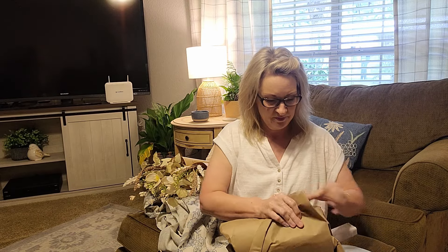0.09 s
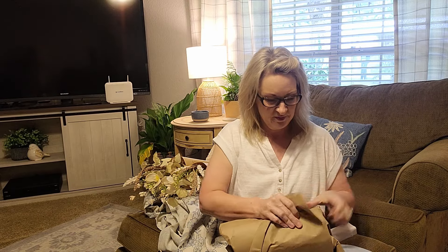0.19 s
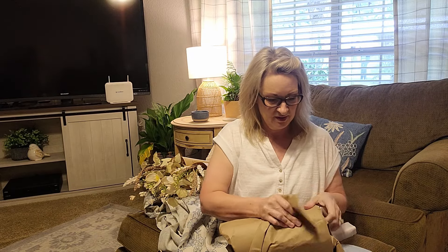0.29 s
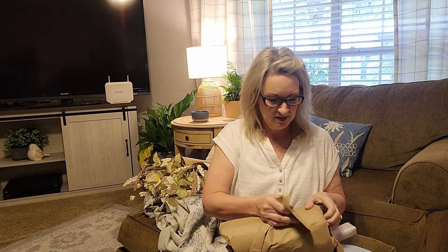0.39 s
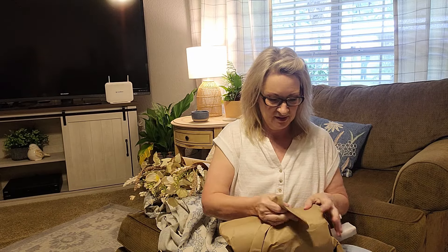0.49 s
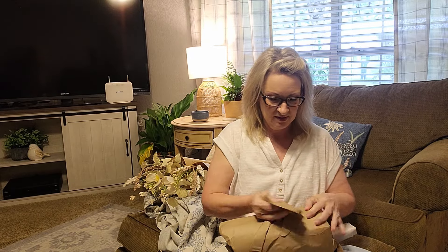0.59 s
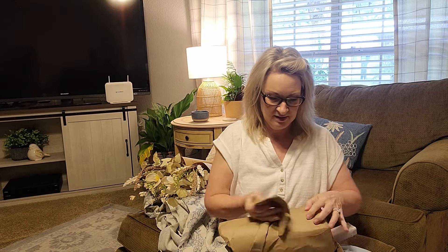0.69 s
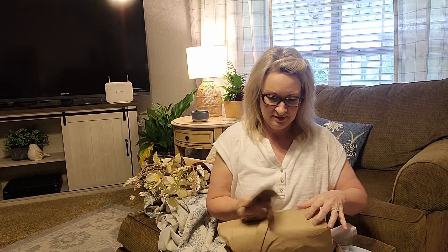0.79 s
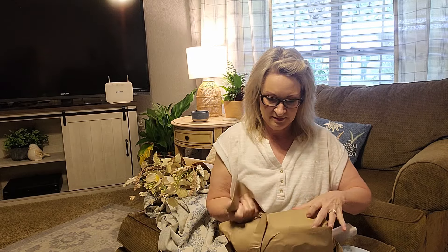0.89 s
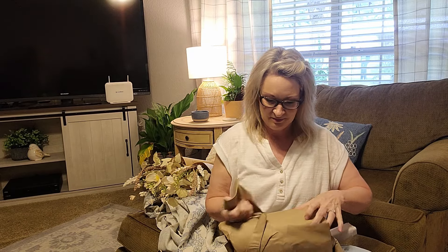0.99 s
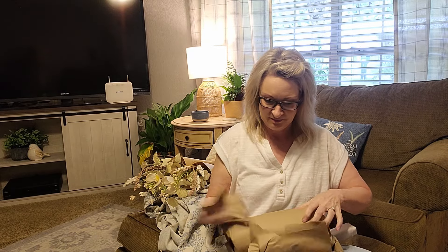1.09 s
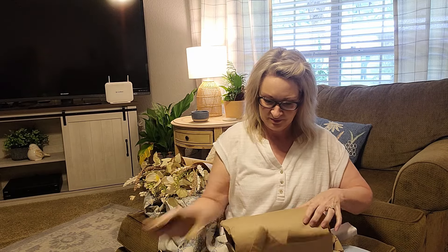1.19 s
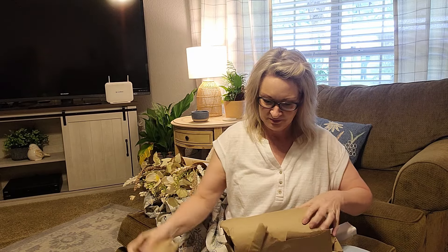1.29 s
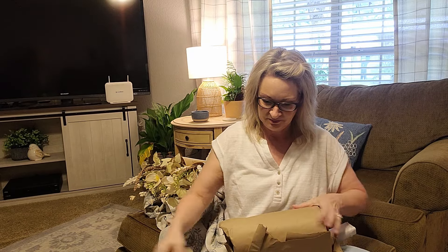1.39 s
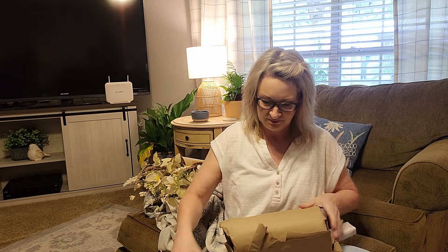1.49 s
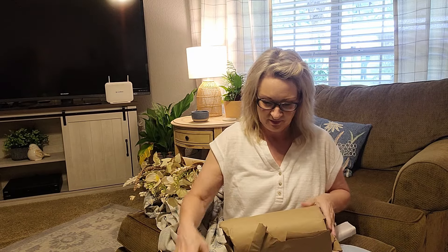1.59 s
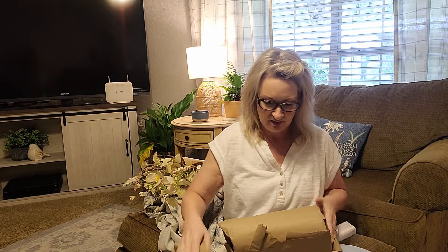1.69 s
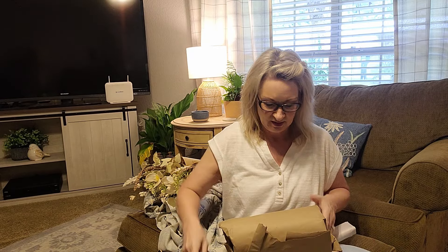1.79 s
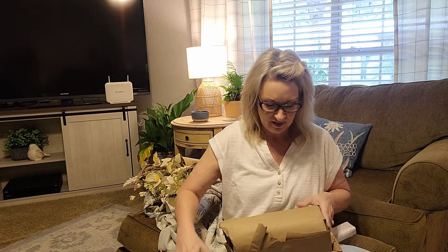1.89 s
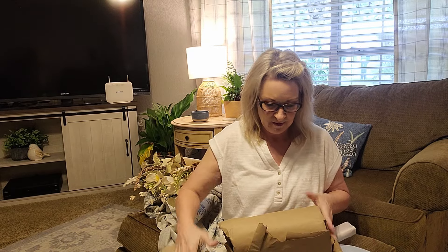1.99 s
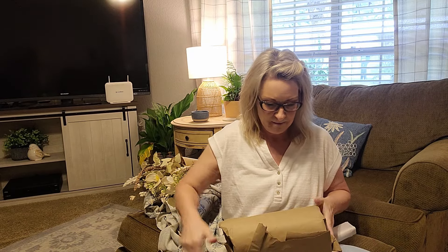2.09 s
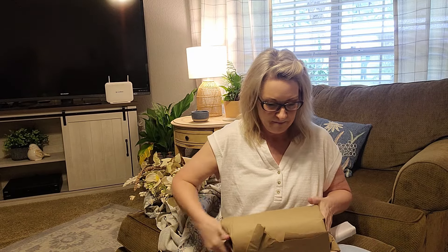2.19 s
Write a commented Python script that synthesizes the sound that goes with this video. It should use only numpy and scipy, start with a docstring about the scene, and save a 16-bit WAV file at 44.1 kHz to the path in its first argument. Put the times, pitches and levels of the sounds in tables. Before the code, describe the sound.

Stiff wrapping paper crackles and pops as it is pulled open in three sweeps, with soft hand bumps on the parcel. It settles into light rustling, picked up by a nearby microphone in a quiet furnished room.

```python
"""Brown wrapping paper is picked at, pulled open in three sweeps and laid aside.
Its creases buckle in a dense crackle, with single snaps and hollow pops on top.
Underneath, the sheet flaps and the hands bump the parcel. A small stereo microphone a few steps
away hears the paper, the short answer of a furnished living room and a faint rumble."""
import sys
import numpy as np
from scipy import signal
from scipy.fft import rfft, irfft, next_fast_len
from scipy.io import wavfile
from scipy.ndimage import map_coordinates

SR = 44100
rng = np.random.default_rng(int(sys.argv[2]) if len(sys.argv) > 2 else 0)


def generate_wav(signal):
    """Clip the signal to [-1, 1] and save it as 16-bit WAV at the path in sys.argv[1]."""
    frames = np.transpose(np.atleast_2d(signal))
    scaled = np.clip(frames, -1, 1) * 32767
    pcm = np.round(scaled).astype(np.int16)
    wavfile.write(sys.argv[1], SR, pcm)


N = 97020

# tone of the room's rumble (frequency [Hz], gain [dB])
RUMBLE_EQ = [(20, -18), (60, 2), (220, -9.5), (310, -0.5), (500, -29.5), (1000, -27)]
# length of the reverb tail (frequency [Hz], t60 [s])
TAIL_T60 = [(100, 0.24), (1500, 0.18), (5000, 0.22), (15000, 0.17)]
# tone of the reverb (frequency [Hz], gain [dB])
REVERB_EQ = [(100, -9.5), (2500, -3.5), (7000, -5.5), (15000, 0)]
# how alike the room sounds left and right (frequency [Hz], correlation [0..1])
ROOM_CORRELATION = [(400, 0.81), (1300, 0.26), (2600, 0.24), (5000, 0.012)]
# colour of the microphone (frequency [Hz], gain [dB])
MIC_EQ = [(450, 2), (620, -4.5), (790, 4), (5300, 0.5), (6100, -3.5), (7300, 0), (8400, -12.5),
          (10000, -12.5), (11800, -2.5), (15500, -8)]
# mismatch of its two channels (frequency [Hz], left minus right [dB])
MIC_BALANCE = [(100, -0.4), (700, 0.8), (2400, 1.1), (5000, 0.5), (8000, 7.5), (12000, -2)]
# the paper's drift in the stereo image (time [s], lead of the left channel [ms])
LEFT_LEAD = [(.6, 0.11), (.85, 0.062), (1.15, 0.046), (1.4, 0.15)]
# modes of the hollow parcel (pitch ratio [1], level [dB], t60 of a 300 Hz bump [s])
PARCEL_MODES = [(0.998, -2, 0.076), (1.88, -8, 0.04)]
# fingers bumping the parcel and the slack sheet (time [s], relative level [dB], pitch [Hz])
HAND_BUMPS = [(0.223, -29, 346), (0.274, -27, 293), (.3, -25.5, 300), (.29, -30.5, 163), (0.348, -28, 299),
              (0.444, -28, 282), (0.447, -36, 170.5), (0.593, -23.5, 285), (.83, -24.5, 336),
              (1.186, -32.5, 80), (1.353, -40.5, 376), (1.773, -39, 300), (1.911, -38, 322),
              (2.068, -31.5, 173), (2.083, -35, 148)]
# stiff panels popping through (time [s], level [dB], pitch [Hz])
PANEL_POPS = [(.106, -30, 520), (.267, -24.5, 1340), (.274, -22.5, 1540), (0.276, -27.5, 870),
              (.304, -28.5, 854), (.5925, -21.5, 1354), (.597, -5.5, 2360), (0.828, -21, 2350),
              (.878, -24, 1030), (1.1799, -10.5, 2850), (1.523, -43, 1035), (2.185, -28.5, 440),
              (2.1849, -29.5, 850)]
# single creases snapping (time [s], relative level [dB], treble lift and bass cut [dB])
CREASE_SNAPS = [(.1056, -19.5, -2), (.1502, -29, -6.5), (.1845, -16.5, 6.5), (.2027, -25, 2),
                (.2335, -10.5, 5), (.309, -17, 2.5), (.3415, -18, 9.5), (.376, -15.5, 2.5),
                (.47, -15, 11.5), (.531, -13.5, 3.5), (.5658, -18, 11.5), (.5795, -9.5, 5.5),
                (.5912, -8.5, -1), (.6076, -11, 13), (.726, -17.5, 7), (.795, -19.5, -6),
                (.8668, -9.5, 8.5), (.89, -10.5, 4), (1.1001, -15, 18.5), (1.1227, -21, -7.5),
                (1.1862, -14, -7.5), (1.2933, -22.5, 2.5), (1.3915, -25.5, -0.5), (1.789, -39, -10),
                (1.837, -38, -8.5), (2.0239, -29, -6), (2.0674, -33, -7.5)]
# tone of a snap before its tilt (frequency [Hz], gain [dB])
SNAP_EQ = [(80, -48), (300, -22.5), (1100, -0.5), (2400, 0), (5000, 1), (16000, -14)]
# low body of the flapping panels (frequency [Hz], gain [dB])
FLAP_EQ = [(30, -16), (75, -16), (160, -9), (215, -13), (305, -4), (420, -3.5), (820, -8), (1250, -15),
           (2500, -42)]
# bite of the crackling creases (frequency [Hz], gain [dB])
CRACKLE_EQ = [(200, -20.5), (700, -12.5), (1200, 0.5), (2400, -1.5), (3500, 3.5), (5200, 1), (7000, -2.5),
              (10000, -26)]
# airy top of the finest wrinkles (frequency [Hz], gain [dB])
FIZZ_EQ = [(2500, -49), (5000, -26), (7000, -0.5), (9000, 2), (12000, -5), (16000, -5)]
# fader rides of the moving sheet, before trims (time [s], flap [dB], crackle [dB], fizz [dB])
SHEET_FADERS = [(0, -54.5, -45, -55), (.125, -51.5, -51, -53.5), (.175, -58.5, -59, -57),
                (.22, -49.5, -39.5, -42), (.28, -42.5, -37, -38.5), (.35, -43.5, -36, -38),
                (.41, -53, -42.5, -42.5), (.475, -43.5, -33.5, -37.5), (.51, -54, -45, -45),
                (.555, -44.5, -37, -33.5), (.591, -39.5, -22.5, -24.5), (.625, -49.5, -34, -46),
                (.675, -54.5, -48, -51), (.77, -49, -38, -39.5), (.81, -41, -32, -31),
                (.89, -39.5, -26.5, -29), (.92, -49.5, -40.5, -50), (.96, -54, -45.5, -51.5),
                (1.04, -52.5, -41.5, -37), (1.12, -40.5, -27, -30), (1.19, -39, -25.5, -33),
                (1.215, -50, -50, -81), (1.26, -56, -58.5, -66), (1.34, -60.5, -58.5, -58),
                (1.39, -49, -50, -49.5), (1.43, -67.5, -64, -74), (1.5, -68, -62, -62),
                (1.63, -58, -50, -55.5), (1.68, -73, -87, -105), (1.75, -68.5, -66, -72),
                (1.84, -65.5, -57, -53), (1.97, -63.5, -63, -65), (2.03, -51, -50.5, -62),
                (2.15, -67.5, -71.5, -66.5), (2.2, -50, -47, -69)]


def amp(db):
    """Decibels to gain."""
    return 10 ** (np.asarray(db) / 20)


def unit(x):
    """Scale to rms 1."""
    return x / np.sqrt(np.mean(x ** 2) + 1e-20)


def along(points, hz):
    """Read (Hz, value) points on a log frequency axis."""
    freqs, values = np.transpose(points)
    return np.interp(np.log(hz + 1), np.log(freqs + 1), values)


def curves(rows):
    """One automation curve, a value per sample, for each column after the time."""
    times, *columns = np.transpose(rows)
    return [np.interp(np.arange(N) / SR, times, column) for column in columns]


def equalise(x, gain_db):
    """Minimum-phase EQ with the curve gain_db(Hz)."""
    n = x.shape[-1]
    size = 2 * next_fast_len(n // 2 + 4096)
    hz = np.fft.rfftfreq(size, 1 / SR)
    cepstrum = irfft(np.log(amp(gain_db(hz))), size)
    cepstrum[..., 1:size // 2] *= 2  # folding onto positive time makes it causal
    cepstrum[..., size // 2 + 1:] = 0
    return irfft(rfft(x, size) * np.exp(rfft(cepstrum)), size)[..., :n]


def fade(t, t60):
    """Exponential decay, 60 dB down at t60."""
    return np.exp(-np.log(1000) * t / t60)


def add(track, start_s, x):
    """Mix x into the track at start_s."""
    part = track[max(0, round(start_s * SR)):][:len(x)]
    part += x[:len(part)]


def diffuse_noise(n):
    """Noise arriving from all sides: narrow in the bass, wide in the treble."""
    correlation = along(ROOM_CORRELATION, np.fft.rfftfreq(n, 1 / SR))
    width = np.arccos(np.clip(correlation, -1, 1)) / 2
    mid, side = irfft(rfft(rng.standard_normal((2, n))) * [np.cos(width), np.sin(width)], n)
    return np.array([mid + side, mid - side])


def room_rumble(level_db=-61.5):
    """A faint, steady bed of low room tone."""
    return amp(level_db) * unit(equalise(diffuse_noise(N), lambda hz: along(RUMBLE_EQ, hz)))


def room_reverb(x, spots=6, spot_s=0.014, early_db=3.5, early_decay_s=0.0093):
    """Near furniture and a short tail answer, differently as the sound jumps about the sheet."""
    out, n = np.zeros((2, N)), SR // 2
    t = np.arange(n) / SR
    for spot in range(spots):
        freqs, times, bands = signal.stft(diffuse_noise(n), SR, nperseg=256)
        decaying = bands * fade(times, along(TAIL_T60, freqs)[:, None])
        tail = signal.istft(decaying, SR, nperseg=256)[1][:, :n] * (t > 0.004)
        early = diffuse_noise(n) * np.exp(-t / early_decay_s) * (t > 0.001)
        response = (unit(tail) + amp(early_db) * unit(early)) / np.sqrt(n)
        away = abs((np.arange(N) / SR / spot_s + spot) % spots - spots / 2)
        send = np.cos(np.pi / 2 * np.minimum(away, 1))  # crossfade from spot to spot
        out += signal.fftconvolve((x * send)[None], response, axes=1)[:, :N]
    return equalise(out, lambda hz: along(REVERB_EQ, hz))


def direct_path(x):
    """The sound reaches the left channel first, by a lead that follows the moving paper."""
    lead = curves(LEFT_LEAD)[0] * SR / 1000
    return np.array([map_coordinates(x, [np.arange(N) + side * lead / 2], order=5) for side in (1, -1)])


def hand_bumps(trim_db=-2.5, attack_s=0.00097):
    """Soft contacts ring the hollow parcel for a few cycles; lower bumps ring longer."""
    out, t = np.zeros(N), np.arange(SR // 4) / SR
    attack = 1 - np.exp(-t / attack_s)
    for start_s, db, hz in HAND_BUMPS:
        stretch = (300 / hz) ** 0.29
        ring = sum(amp(mode_db) * np.sin(2 * np.pi * hz * ratio * t) * fade(t, t60 * stretch)
                   for ratio, mode_db, t60 in PARCEL_MODES)
        add(out, start_s, amp(db + trim_db) * ring * attack)
    return out


def panel_pops(attack_s=0.00034, t60_cycles=21.2, wander_rad=0.24):
    """A stiff panel flips with a rough, hollow knock; the wider it is, the lower and longer."""
    out, t = np.zeros(N), np.arange(SR // 8) / SR
    attack = 1 - np.exp(-t / attack_s)
    for start_s, db, hz in PANEL_POPS:
        phase_drift = wander_rad * np.cumsum(rng.standard_normal(len(t))) * np.sqrt(hz / SR)
        ring = np.sin(2 * np.pi * hz * t + phase_drift) * fade(t, t60_cycles / hz)
        add(out, start_s, amp(db) * ring * attack)
    return out


def crease_snaps(trim_db=15, lead_s=0.009, rise_s=0.0026, tick_db=7, tick_s=0.0005, pivot_hz=4000):
    """A stiff crease starts to give, flips with a sharp tick and shivers briefly."""
    out, t = np.zeros(N), np.arange(2048) / SR - lead_s
    shiver = np.exp(np.minimum(t, 0) / rise_s) * fade(np.maximum(t, 0), t60=0.015)
    tick = amp(tick_db) * np.exp(-abs(t) / tick_s)
    for flip_s, db, tilt_db in CREASE_SNAPS:
        burst = rng.standard_normal(len(t)) * (shiver + tick)
        burst /= np.linalg.norm(burst)
        tone = lambda hz: along(SNAP_EQ, hz) + tilt_db * np.tanh(np.log((hz + 1) / pivot_hz) / 0.51)
        add(out, flip_s - lead_s, amp(db + trim_db) * equalise(burst, tone))
    return out


def facet_ring(t60, size=1024):
    """The brief ring of one patch of paper, different every time; energy 1."""
    ring = rng.standard_normal(size) * fade(np.arange(size) / SR, t60)
    return ring / np.linalg.norm(ring)


def buckling(level_db, eq, base_per_s, t60, facets=16, spread_db=5, run_db=3, runs_per_s=130):
    """Paper facets buckle at random, setting each other off in little runs, over a sliding hiss."""
    crowding = amp(0.25 * (level_db - level_db.mean()))  # a harder pull packs in more buckles
    sizes = amp(spread_db * np.minimum(rng.exponential(size=N), 3))
    runs = amp(run_db * map_coordinates(rng.standard_normal(N), [np.arange(N) * runs_per_s / SR]))
    triggers = rng.random(N) < base_per_s * crowding * runs / SR
    kicks = sizes * triggers * np.sqrt(runs / crowding)  # crowding adds density, not level
    on_facet = rng.integers(facets, size=N) == np.arange(facets)[:, None]
    rings = np.array([facet_ring(t60) for _ in range(facets)])
    grains = unit(signal.oaconvolve(kicks * on_facet, rings, axes=1)[:, :N].sum(0))
    slide = amp(-12.5) * rng.standard_normal(N)
    return amp(level_db) * unit(equalise(grains + slide, lambda hz: along(eq, hz)))


def paper_sheet():
    """Wide panels flap, creases crackle and the finest wrinkles fizz as the sheet is pulled."""
    flap_db, crackle_db, fizz_db = curves(SHEET_FADERS)
    flap = buckling(flap_db - 0.5, FLAP_EQ, base_per_s=650, t60=0.0087)
    crackle = buckling(crackle_db - 2.5, CRACKLE_EQ, base_per_s=950, t60=0.0091)
    fizz = buckling(fizz_db - 0.5, FIZZ_EQ, base_per_s=1000, t60=0.0007)
    return flap + crackle + fizz


def scene():
    """Paper and parcel over the room's rumble; snaps and pops sit drier than the rustle."""
    rustle = paper_sheet() + hand_bumps()
    accents = crease_snaps() + panel_pops()
    reverb_send = rustle + amp(-5) * accents
    return room_rumble() + room_reverb(reverb_send) + direct_path(rustle + accents)


def record(dry, top_hz=15850):
    """The microphone colours each channel a little differently and cuts everything above top_hz."""
    heard = equalise(dry, lambda hz: along(MIC_EQ, hz) + np.outer([0.5, -0.5], along(MIC_BALANCE, hz)))
    size = next_fast_len(N + SR // 4)
    passband = np.fft.rfftfreq(size, 1 / SR) < top_hz
    return irfft(rfft(heard, size) * passband, size)[:, :N]


dry = scene()
out = record(dry)
generate_wav(out)
```